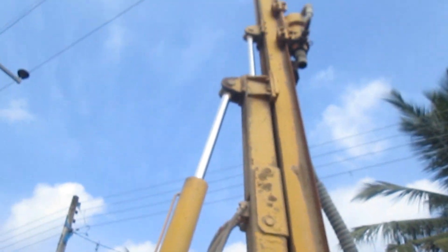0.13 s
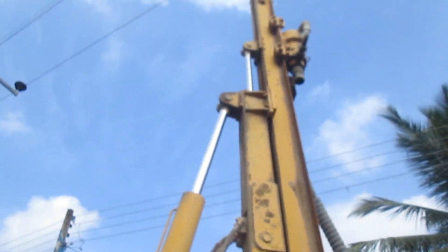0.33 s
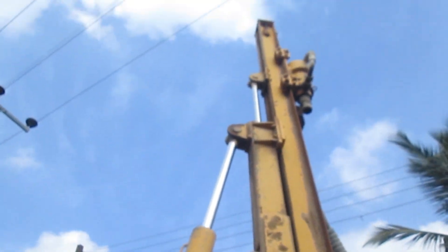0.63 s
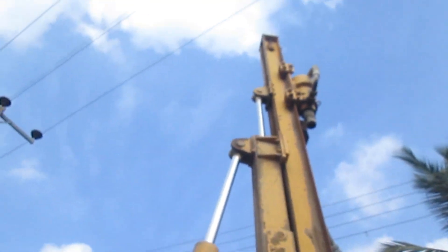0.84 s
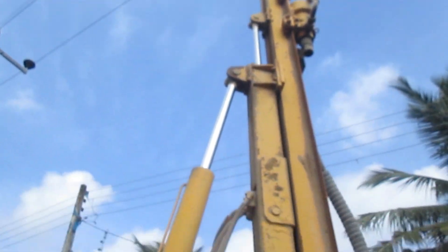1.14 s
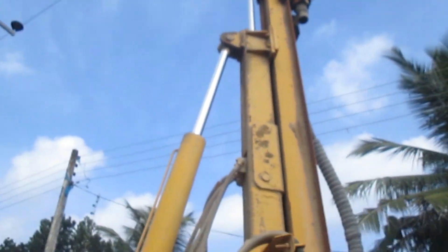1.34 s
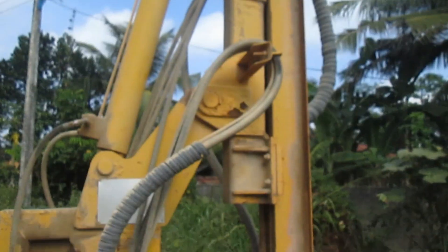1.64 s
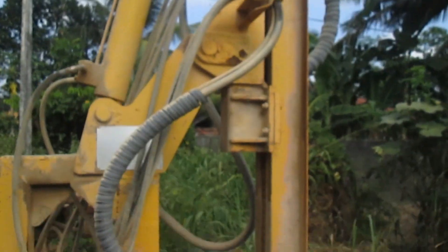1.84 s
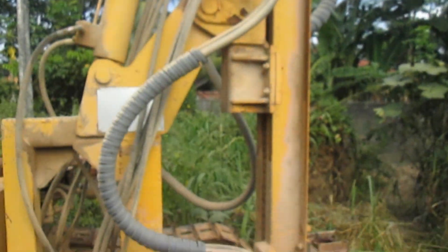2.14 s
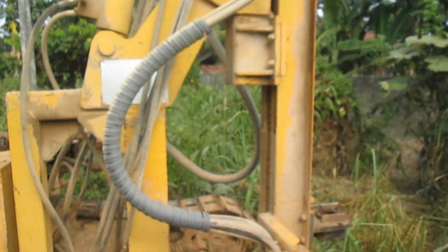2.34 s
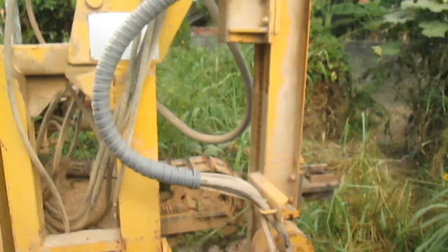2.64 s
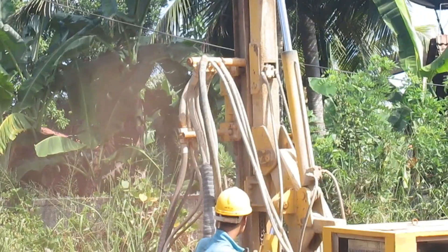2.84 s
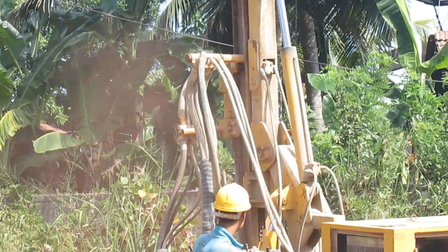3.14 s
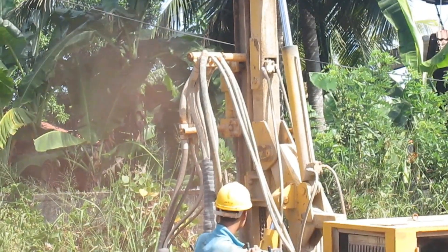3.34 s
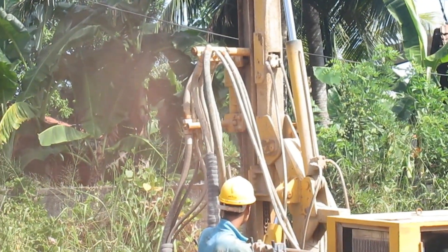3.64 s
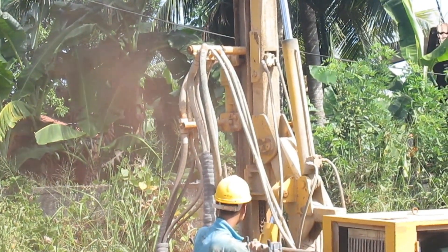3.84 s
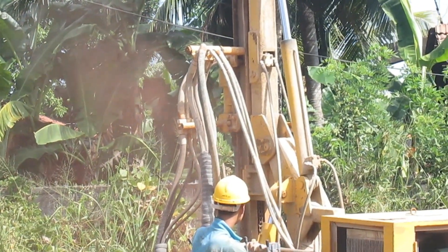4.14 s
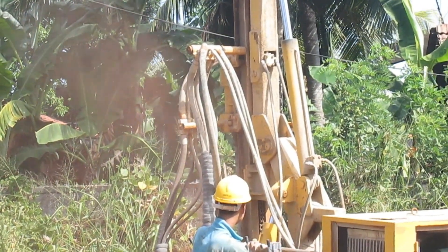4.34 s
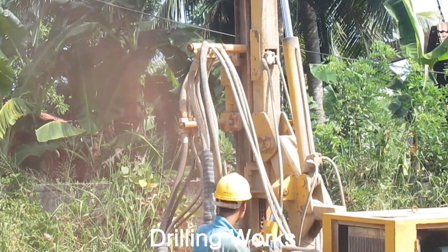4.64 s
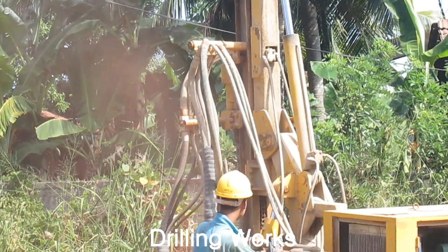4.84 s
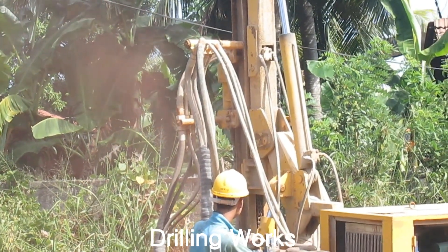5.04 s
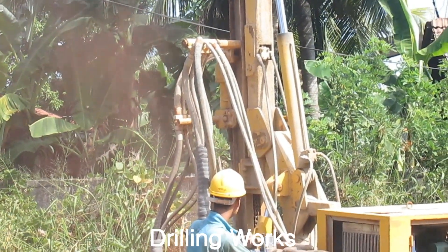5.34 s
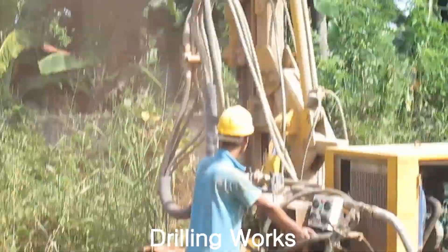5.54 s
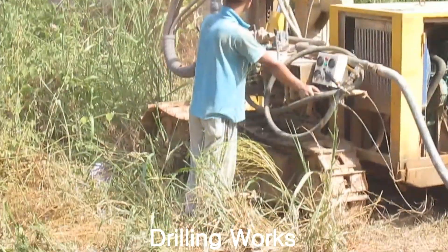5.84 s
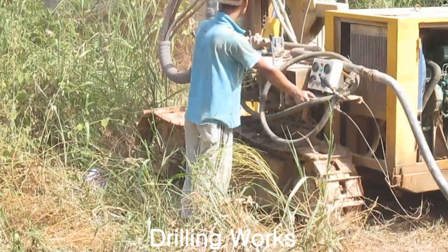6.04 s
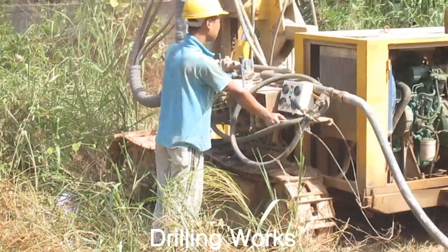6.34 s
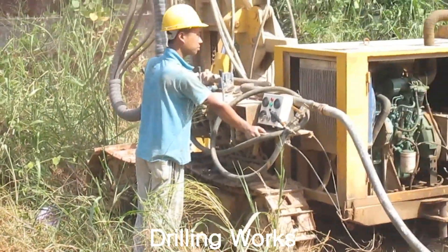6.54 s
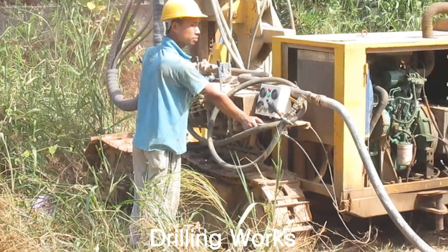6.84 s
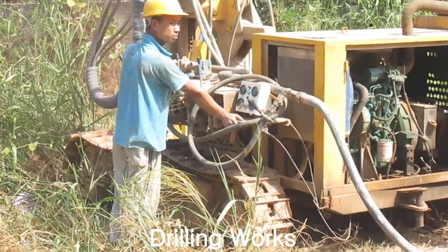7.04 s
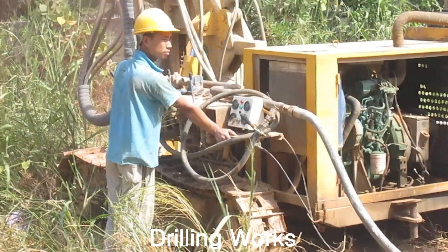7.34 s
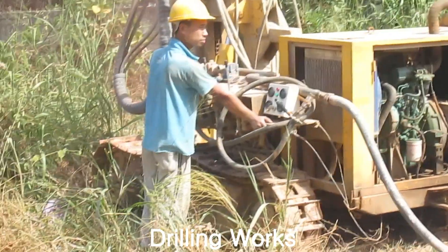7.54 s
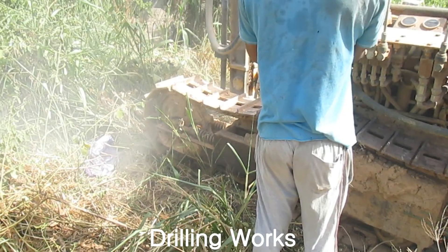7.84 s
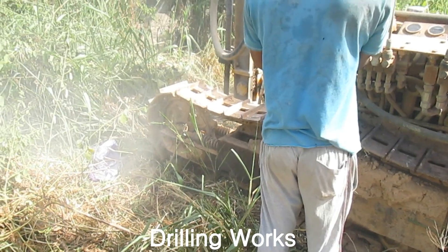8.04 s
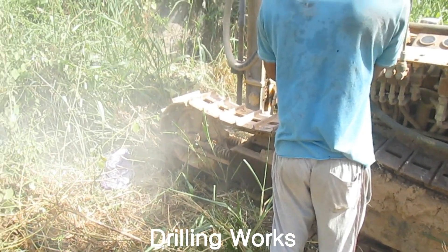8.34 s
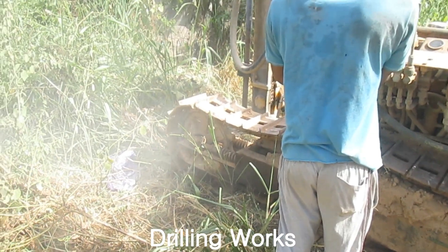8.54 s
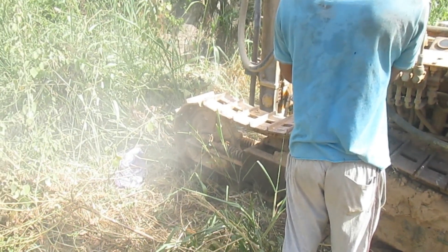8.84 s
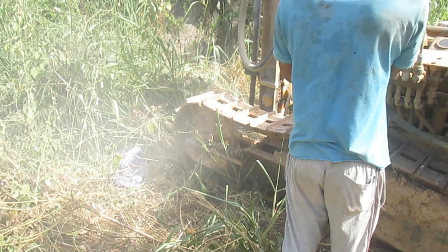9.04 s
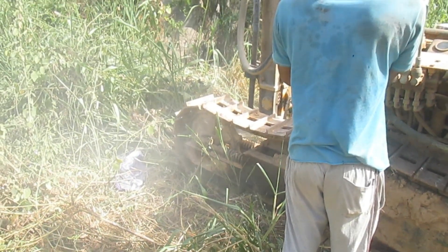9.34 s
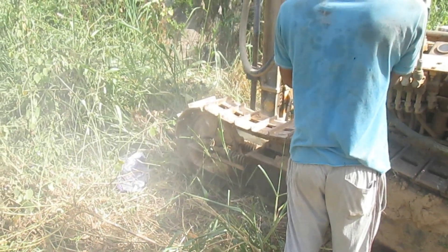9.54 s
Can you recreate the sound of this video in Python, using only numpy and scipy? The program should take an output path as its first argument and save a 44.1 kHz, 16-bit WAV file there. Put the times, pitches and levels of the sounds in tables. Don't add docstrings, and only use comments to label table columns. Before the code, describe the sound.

A drilling rig's air hammer pounds rapidly over engine roar and blown air, in three different outdoor views cut apart by brief abrupt silences.

```python
import sys
import numpy as np
from scipy import signal
from scipy.io import wavfile
from scipy.ndimage import uniform_filter1d

SR = 44100
rng = np.random.default_rng(int(sys.argv[2]) if len(sys.argv) > 2 else 0)


def master_out(mix):
    frames = np.transpose(np.atleast_2d(mix))
    ceiling = np.clip(frames, -1, 1)
    pcm = np.round(ceiling * 32767).astype(np.int16)
    wavfile.write(sys.argv[1], SR, pcm)


def invert_db(x):
    u = np.asarray(x, float) / 20
    return 10 ** u


N = 427318

# start in seconds, end in seconds, first blow in seconds, time between blows in
# seconds, growth of that time per blow in seconds.
SPOTS = [
    (0, 2.749, .04387, .09084, 1.56e-5),
    (2.961, 7.551, 3.02213, .071715, 0),
    (7.881, 9.7, 7.88586, .069605, 0),
]
# pitch in Hz, peak in dB, swell time in ms, lag of the peak in ms.
BLOW_RINGS = [
    [(51.4, -17.5, 43, 4.4), (82, -22.5, 21, 14.8), (144.7, -15, 11, 1), (170.5, -23.5, 26.4, 17),
     (192, -27.5, 17, -1), (240.5, -25, 15.7, 1.8), (278, -21.5, 11, 1.5), (418, -7, 1.95, 0.28),
     (472, -21.5, 6.4, 9), (795, -20.5, 1, 0.13)],
    [(65, -19.5, 22, -11.5), (99.3, -18.5, 13.7, 21.5), (115, -24.5, 11, -5), (154, -15.5, 3.8, 1.2),
     (248, -22, 12, 29), (365, -19.5, 4.5, 5), (840, -10, 2.19, 0.26), (1500, -23.5, 2.2, 0.64)],
    [(68, -14.5, 29.5, -21), (106.5, -15.5, 10.7, 0.7), (174, -22, 13, 19.5), (228, -19.5, 27.4, 31.5),
     (317, -11, 4.3, 0.6), (396, -21.5, 14, 20.5), (605, -21, 1.3, -4), (774, -17, 1.8, 6)],
]
# delay in ms, ring in dB, push (+) or pull (-) as a factor,
# timing spread in ms, hiss in dB, hiss length in ms.
EXHAUST_PUFFS = [
    [(0, -1.5, 0.97, 0.13, 11, 3.1), (18.1, -21.5, -1.9, 2, 11.5, 6.8), (35.19, -3, -0.78, 0.33, 11.5, 3.7)],
    [(0, 1.5, 0.82, 0.16, 7, 4.5), (16.08, -6, -0.83, 1, 11, 5.3), (54.1, -12.5, 0.34, 1.5, 0.5, 1.8)],
    [(0, 4, 0.68, 0, 2.5, 11), (18.53, 0, 1, 0.18, -8, 3.1), (37.1, -3, 1, 0.53, 1, 6.1)],
]
# frequency in Hz, level in dB per Hz.
ROAR_SPECTRA = [
    [(30, -71), (50, -64.5), (89, -69), (140, -60), (300, -62), (450, -59), (650, -62.5), (960, -66),
     (1500, -70), (2080, -79), (3500, -85), (4700, -95), (6600, -96), (15800, -113)],
    [(30, -58.5), (60, -66.5), (140, -46), (210, -51), (360, -52.5), (596, -66.5), (868, -57.5),
     (1260, -65.5), (1500, -65), (2030, -79.5), (3270, -87.5), (5260, -91.5), (5960, -99), (12900, -124),
     (13300, -150)],
    [(30, -69), (60, -59), (140, -48.5), (190, -58), (300, -53.5), (430, -56.5), (700, -53.5), (960, -56),
     (1430, -58), (2120, -65), (4700, -70.5), (9100, -77), (10400, -78.5), (15800, -91)],
]
# frequency in Hz, lift in dB.
PUFF_COLOUR = [
    [(150, -19), (300, -3), (700, 2.5), (1100, -2), (2300, -8.5), (3600, -1), (6500, -4.5), (12000, -4)],
    [(150, -11.5), (350, -8), (900, -5), (1600, 0.5), (2500, -2.5), (4500, -1), (8000, -1.5), (12000, -9.5)],
    [(150, -12), (350, 12), (800, 1.5), (1600, -8.5), (2500, -6), (4500, -14), (8000, -19), (12000, -6)],
]
# time in seconds, level in dB.
LOAD_SWELL = [(0, -0.1), (.75, .4), (1.15, 3.5), (1.6, -0.2), (2.2, 1.2), (2.75, 0.4), (2.96, 4),
              (3.1, -.5), (3.75, 0.85), (4.5, -0.5), (5.3, -3), (6.4, -0.3), (6.9, 1.2), (7.3, -2.2),
              (7.55, -0.1), (8.2, 0.15), (9.1, -1.5), (9.69, 0.3)]
# time in seconds, peak in dB, pitch in Hz, time to fall 60 dB in seconds, width
# in Hz.
CLINKS = [(0.292, -21, 4600, 0.009, 2500), (.2922, -32, 8500, 0.006, 7000),
          (1.8612, -32, 3300, 0.012, 1500), (2.733, -22, 5500, 0.0092, 4000),
          (2.733, -30.5, 10500, 0.015, 5950), (3.0222, -38, 8000, .004, 12000),
          (3.1168, -34, 3000, .02, 397), (3.238, -49, 7500, .006, 6000), (3.436, -19, 2900, 0.0069, 750),
          (3.468, -41, 4600, 0.033, 506), (3.6464, -18, 2850, 0.0071, 750), (3.8033, -34, 3010, .03, 400),
          (4.2866, -25.5, 3000, 0.019, 700), (4.6364, -35.5, 3000, 0.026, 900),
          (7.5499, -23, 4000, .004, 20000)]
# pitch in Hz, width in Hz.
PUMP_WHINE = (3680, 120)
# frequency in Hz, width in Hz.
MIC_NOTCHES = [(3930, 110), (7850, 110)]
# pitch in Hz, resting level in dB, width in Hz.
ENGINE_DRONE = [
    (159, -42.5, 18),
    (150, -32, 33),
    (149, -36.5, 11.2),
]
# pitch in Hz, width in Hz, dB over the roar.
PANELS = [
    [(3530, 430, -14), (4350, 350, -17.5), (6470, 250, -9), (8600, 200, -11)],
    [(3000, 100, -27), (3600, 75, 1), (4600, 180, -1), (5190, 190, -3), (7200, 230, -5), (8900, 470, -0.5),
     (11500, 490, 2)],
    [(2840, 230, -11), (3560, 150, -4), (5500, 450, -6), (9000, 390, -1)],
]
# frequency in Hz, width in Hz, depth from 0 to 1.
REFLECTION_DIPS = [
    [(4900, 700, 0), (7270, 500, 0.1)],
    [(1720, 180, 0.45), (3290, 240, 0.7), (4500, 300, 0.4), (5760, 200, 0.4), (6750, 280, 0.6),
     (7600, 400, 0.7), (10000, 1600, 0.6)],
    [(2500, 180, 0.01), (10900, 400, 0)],
]
# detuning as a share of the pitch, scatter of the puffs in dB.
UNEVENNESS = [
    (.02, .9),
    (.03, 1.3),
    (.008, .6),
]
# time in seconds, dB over the usual blow.
ODD_BLOWS = [(1.408, 2.5), (1.864, -1.5), (2.137, 3.0), (2.229, -10), (2.502, 3), (3.022, 0.5),
             (3.237, 3.5), (3.739, 2), (4.026, 1.5), (4.17, -3.5), (4.385, 3.6), (4.672, 3), (4.743, -5),
             (4.887, 2.5), (4.958, -2), (5.102, 3), (5.174, -4.3), (5.389, -2), (5.46, -1.5), (5.532, -2.6),
             (5.604, -5), (5.819, -4.5), (5.891, 3), (6.393, -2), (6.536, 2.5), (6.823, 2.5), (6.966, 2),
             (8.652, 1), (8.791, 2.6), (9.278, -2)]
USUAL_BLOW_DB = [-1.2, 1.12, -0.5]
# treble against the roar at the start in dB, at the end in dB.
TURN_DB = [(.5, -0.14), (-1.5, -0.41), (.6, 0.55)]
# time in seconds, pitch in Hz, level in dB.
ENGINE_SURGES = [(2.96, 148.4, -16.5), (3.22, 159.6, -26.5), (3.471, 160, -22), (3.68, 150, -21.5),
                 (3.981, 157.3, -25.5), (4.24, 156.3, -22), (4.621, 146, -24.5), (4.87, 141.8, -28),
                 (5.26, 157, -26), (5.6, 142.8, -23), (6.38, 147.4, -28), (6.66, 149, -32),
                 (6.91, 144.5, -22.5), (7.2, 159.4, -26), (7.9, 152, -24), (8.27, 135, -32),
                 (8.53, 158, -25.5), (8.78, 152, -27.5), (9.25, 149, -32), (9.69, 149.3, -26)]
PANEL_RATTLE_DB = [7, -8.5, -6]


def read(points, hz):
    f, value = np.transpose(points)
    return np.interp(np.log(hz + 1), np.log(f + 1), value)


def add(mix, s, sound):
    at = round(s * SR)
    sound = sound[max(-at, 0):]
    part = mix[max(at, 0):][:len(sound)]
    part += sound[:len(part)]


def resonate(x, hz, width):
    turn = np.exp(2j * np.pi * np.cumsum(hz * np.ones(len(x))) / SR)
    r = np.exp(-np.pi * width / SR)
    return 2 * (turn * signal.lfilter([1 - r], [1, -r], x / turn)).real


def fuzzy(t, hz, width):
    tone = resonate(rng.standard_normal(len(t)), hz, width)
    tone = resonate(tone, hz, width)
    return tone / tone.std()


def noise(t, points, patchy_db):
    frames = len(t) // 256 + 5
    hz = np.fft.rfftfreq(1024, 1 / SR)
    a, b, patches = rng.standard_normal((frames, 513, 3)).T
    patches = uniform_filter1d(patches, size=8, axis=0)
    patches = uniform_filter1d(patches, size=10, axis=1)
    level_db = read(points, hz)[:, None] + patchy_db * patches / patches.std()
    z = (a + 1j * b) * invert_db(level_db)
    return signal.istft(z * np.sqrt(SR / 512), nperseg=1024, noverlap=768)[1][:len(t)]


def swelling(t, s):
    return (t / s * np.exp(1 - t / s)) ** 2


def resonance_shape(hz, centre, width):
    return 1 / (1 + (2 * (hz - centre) / width) ** 2)


def load_db(t):
    return np.interp(t, *np.transpose(LOAD_SWELL))


def drone(k, t):
    rest_hz, rest_db, width = ENGINE_DRONE[k]
    surge_s = 0.059
    coarse = t[::64]
    s, hz, db = np.transpose(ENGINE_SURGES)[:, :, None]
    surge = invert_db(db) * np.exp(-.5 * ((coarse - s) / surge_s) ** 2)
    level = invert_db(rest_db) + surge.sum(axis=0)
    pitch = (invert_db(rest_db) * rest_hz + (surge * hz).sum(axis=0)) / level
    return np.interp(t, coarse, level) * fuzzy(t, np.interp(t, coarse, pitch), width)


def moving_air(k, t, hiss):
    hz = np.geomspace(30, 16000, num=500)
    panels = sum(invert_db(db) * resonance_shape(hz, f, width) for f, width, db in PANELS[k])
    dips = np.ones(len(hz))
    for f, width, depth in REFLECTION_DIPS[k]:
        dips *= 1 - np.clip(depth, 0, .9) * resonance_shape(hz, f, width)
    roar = read(ROAR_SPECTRA[k], hz) + 20 * np.log10((1 + panels) * dips)
    rattle = roar + 20 * np.log10(1 + invert_db(PANEL_RATTLE_DB[k]) * panels)
    air = noise(t, np.c_[hz, roar], patchy_db=1.0)
    puffed = noise(t, np.c_[hz, rattle + read(PUFF_COLOUR[k], hz)], patchy_db=.6)
    air = air + hiss * puffed
    if k == 0:
        turn_s, turn_length_s, facing_db, averted_db = 1.37, .25, 1, -4
        clatter_hz, clatter_width = 3950, 1100
        tilt_db = np.interp(t, [turn_s, turn_s + turn_length_s], [facing_db, averted_db])
        clatter = resonate(resonate(air, clatter_hz, clatter_width), clatter_hz, clatter_width)
        air = air + (invert_db(tilt_db) - 1) * clatter
    treble = signal.sosfilt(signal.butter(N=2, Wn=2200, btype="high", fs=SR, output="sos"), air)
    return air + treble * (invert_db(np.interp(t, t[[0, -1]], TURN_DB[k])) - 1)


def whine(t):
    throb_db = 5 * np.cos(2 * np.pi * (t - 3.004) / SPOTS[1][3])
    return invert_db(-64.5 + 1.1 * load_db(t) + throb_db) * fuzzy(t, *PUMP_WHINE)


def scrape(t):
    seize_s, seize_rise_s, seize_db = 7.36, .08, 17
    bite = np.clip((t - seize_s) / seize_rise_s, 0, 1)
    return invert_db(-50 + seize_db * bite - 9) * fuzzy(t, 2420 + 200 * bite, 520)


def clinks():
    out, t = np.zeros(N), np.arange(2200) / SR
    for s, db, hz, t60, width in CLINKS:
        soft_start = (1 - np.exp(-t / .0006)) ** 2
        burst = rng.standard_normal(len(t)) * invert_db(-60 * t / t60) * soft_start
        for _ in range(3):
            burst = resonate(burst, hz, width)
        add(out, s, invert_db(db) * burst / abs(burst).max())
    return out


def hammer(k):
    ringing, hiss = np.zeros(N), np.zeros(N)
    start, end, first, period, slowing = SPOTS[k]
    detune, scatter_db = UNEVENNESS[k]
    odd_s, odd_db = np.transpose(ODD_BLOWS)
    last = int(np.ceil((min(end, N / SR) - first) / period))
    for n in range(-1, last + 1):
        blow = first + period * n + slowing * n * n / 2
        odd = abs(odd_s - blow) < period / 2
        for j, (delay, ring_db, sign, spread, hiss_db, length) in enumerate(EXHAUST_PUFFS[k]):
            late, size, *tune = rng.standard_normal(2 + len(BLOW_RINGS[k]))
            at = blow + (delay + spread * late) / 1000
            puff_db = scatter_db * size
            if j == 0:
                puff_db = USUAL_BLOW_DB[k] + (odd_db[odd].sum() if odd.any() else puff_db)
            t = np.arange(round(SR * length / 150)) / SR
            add(hiss, at - length / 1000, invert_db(hiss_db + .5 * puff_db) * swelling(t, length / 1000))
            for (hz, db, swell, lag), off in zip(BLOW_RINGS[k], tune):
                low = swell > 6.5
                if low and j:
                    continue
                t = np.arange(round(SR * swell / 150)) / SR
                pitch = hz * (1 + detune * off * (not low))
                wave = np.cos(2 * np.pi * pitch * (t - swell / 1000))
                level_db = db + (0 if low else ring_db + puff_db)
                ring = sign * invert_db(level_db) * swelling(t, swell / 1000) * wave
                add(ringing, at + (lag - swell) / 1000, ring)
    return ringing, hiss


def rig(k, t):
    span = np.round(t * SR).astype(int)
    ringing, hiss = hammer(k)
    swell = invert_db(load_db(t))
    return ringing[span] * np.sqrt(swell) + swell * moving_air(k, t, hiss[span]) + drone(k, t)


def scene():
    out = clinks()
    for k, (start, end, *_) in enumerate(SPOTS):
        t = np.arange(round(start * SR), min(round(end * SR), N)) / SR
        sound = rig(k, t)
        if k == 1:
            sound = sound + whine(t) + scrape(t)
        add(out, start, sound)
    return out[None]


def roll_off(x):
    return signal.sosfilt(signal.butter(12, 16470, fs=SR, output="sos"), x)


def record(dry):
    t = np.arange(N) / SR
    x = signal.sosfilt(signal.butter(N=2, Wn=30, btype="high", fs=SR, output="sos"), dry)
    for hz, width in MIC_NOTCHES:
        x = signal.lfilter(*signal.iirnotch(hz, hz / width, SR), x)
    gate = sum(np.clip((t - spot[0]) / .003, 0, 1) * (t < spot[1] - .0003) for spot in SPOTS)
    x = np.clip(x, -.95, .95) * gate
    band_limit = signal.firwin(511, 15750, window=("kaiser", 9), fs=SR)
    x = signal.oaconvolve(x, band_limit[None], "same")
    return roll_off(x)


dry = scene()
out = record(dry)
master_out(out)
```